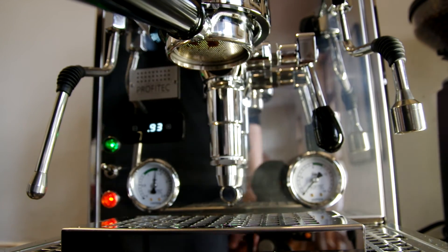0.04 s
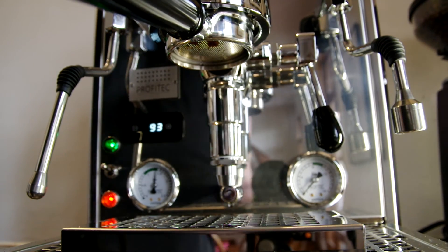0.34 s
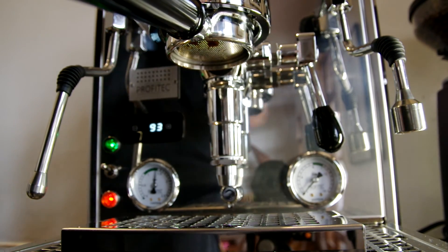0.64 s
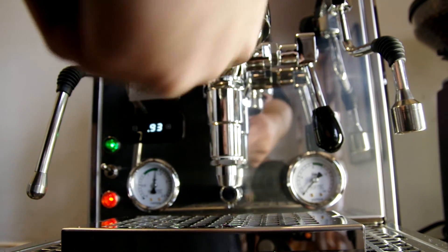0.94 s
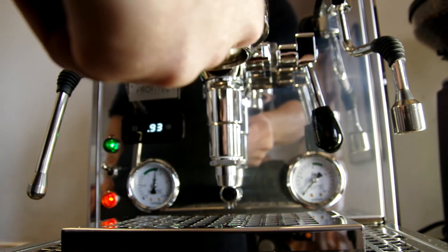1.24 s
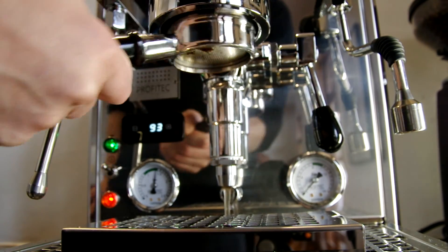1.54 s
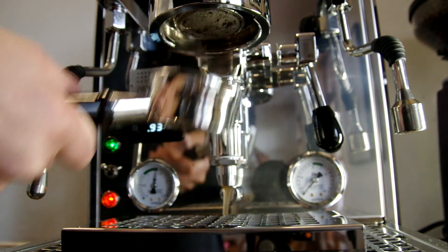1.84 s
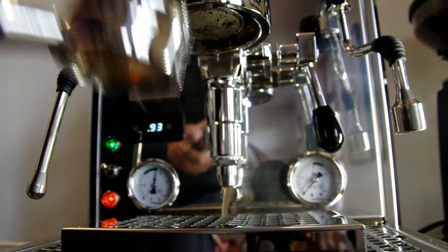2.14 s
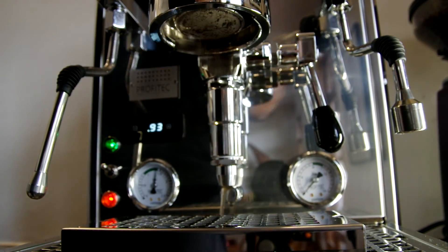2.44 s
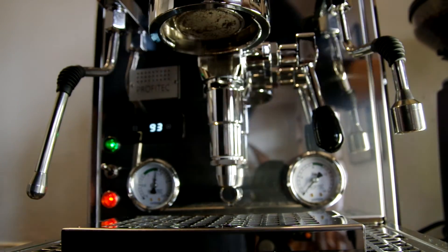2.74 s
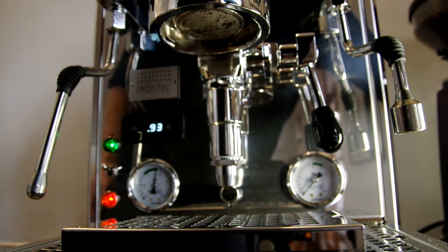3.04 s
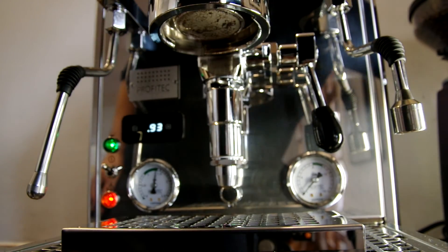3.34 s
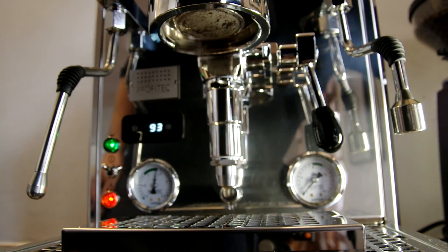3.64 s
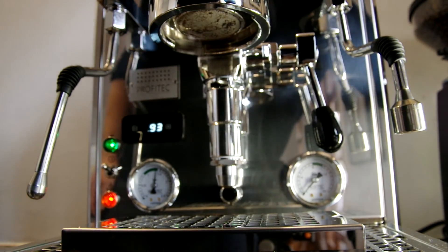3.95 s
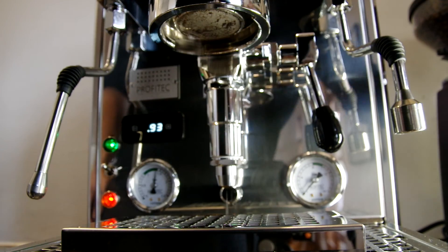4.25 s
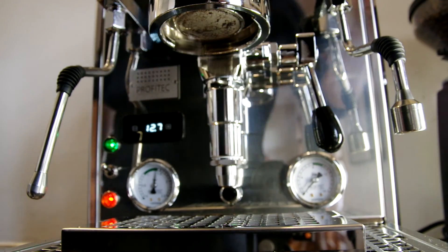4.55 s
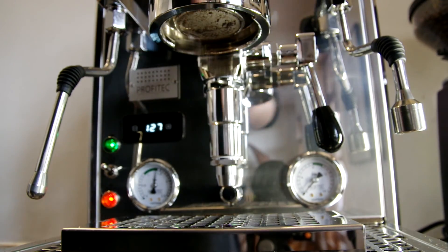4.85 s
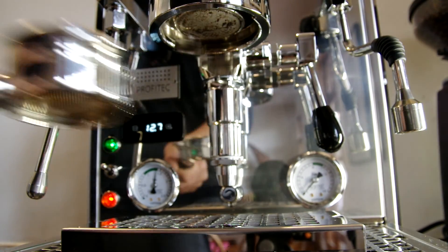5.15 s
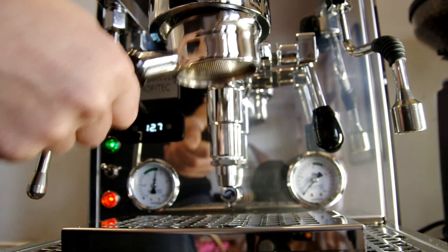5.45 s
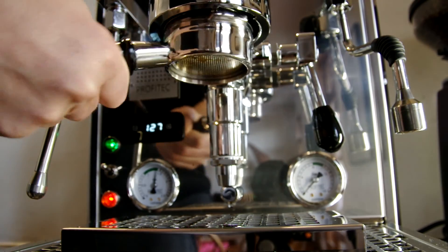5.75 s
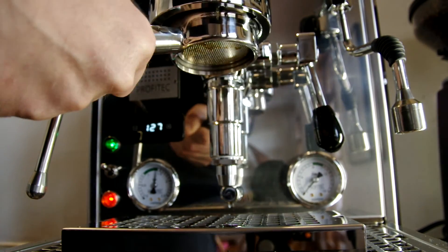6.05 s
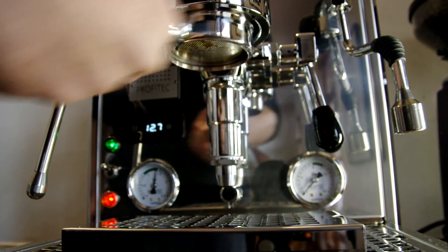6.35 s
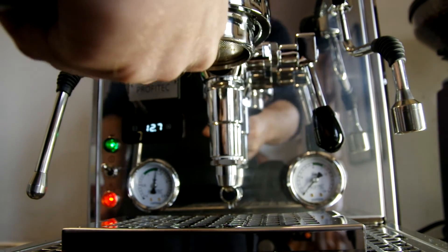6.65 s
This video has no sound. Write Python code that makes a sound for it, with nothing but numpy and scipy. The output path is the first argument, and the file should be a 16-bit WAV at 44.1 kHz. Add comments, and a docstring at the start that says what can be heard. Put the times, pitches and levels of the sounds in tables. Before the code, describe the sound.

A metal filter handle clanks out of an espresso machine, is banged empty, then clanks and grinds back in over faint hiss.

```python
"""A metal filter handle is twisted out of an espresso machine, banged empty on a knock box and locked in.
Impacts excite its normal modes, and stick-slip friction grinds at its lugs as it turns. The boiler
hisses and simmers; a brief opening clatter, small clinks, brushing cloth and soft footsteps surround it.
The close microphone's limiter ducks at each hard clank, so the kitchen's reverberation swells back."""
import sys
import numpy as np
from scipy import signal
from scipy.fft import rfft, irfft
from scipy.io import wavfile
from scipy.ndimage import uniform_filter1d

SR = 44100
rng = np.random.default_rng(int(sys.argv[2]) if len(sys.argv) > 2 else 0)


def wav_record(signal):
    """Record a signal, one row per channel, as 16-bit PCM in the file named by sys.argv[1]."""
    frames = np.transpose(np.atleast_2d(signal))
    bounded = np.clip(frames, -1, 1)
    # unit amplitude maps onto the largest positive 16-bit level
    quanta = np.round(bounded * 32767).astype(np.int16)
    wavfile.write(sys.argv[1], SR, quanta)


N = 304731
TIME = np.arange(N) / SR
T = TIME[:SR // 2]  # time axis of one impact


def amp(db):
    """Amplitude ratio: a factor of ten for every 20 dB."""
    return 10 ** (np.asarray(db) / 20)


def unit(x):
    """Normalisation to rms 1."""
    return x / np.sqrt(np.mean(x ** 2) + 1e-20)


def value_at(points, hz):
    """Linear interpolation on a logarithmic frequency axis."""
    f, value = np.transpose(points)
    return np.interp(np.log(hz + 1), np.log(f + 1), value)


def add(mix, s, sound):
    """Superposition of a sound on the mix, starting at s seconds."""
    part = mix[max(round(s * SR), 0):][:len(sound)]
    part += sound[:len(part)]


def noise(spectrum, size, tilt_db=0):
    """Spectral shaping of white noise to rms 1, with a tilt per octave above 1 kHz."""
    hz = np.fft.rfftfreq(size, 1 / SR)
    octaves = np.log2(np.maximum(hz, 1000))
    gain = amp(value_at(spectrum, hz) + tilt_db * octaves)
    return unit(irfft(rfft(rng.standard_normal(size)) * gain, size))


# steam hiss envelope: t/s, level/dB
HISS_ENVELOPE = [(0, -44), (3.5, -44.5), (5.3, -49.5), (6.9, -48)]
# spectra of the hiss and rumble, and the machine's steady tones: f/Hz, level/dB
HISS_SPECTRUM = [(900, -7.5), (1700, -8.5), (2600, -2), (4500, -1), (6500, 0.5), (8200, 0), (9700, -10),
                 (12000, -15), (16000, -26)]
RUMBLE_SPECTRUM = [(12, -39), (20, 4.5), (70, 5.5), (135, -0.5), (176, -2.5), (321, 2.5), (445, -18.5),
                   (720, -1.5), (943, -11), (1170, -20), (2000, -32.5), (2600, -47), (4400, -120)]
HUM_TONES = [(50, -60.5), (100, -63.5), (10718, -66.5)]

def boiler():
    """Broadband steam noise fades slightly over a low rumble and the line spectrum of a hum."""
    hiss = amp(np.interp(TIME, *np.transpose(HISS_ENVELOPE))) * noise(HISS_SPECTRUM, N)
    hum = sum(amp(db) * np.sqrt(2) * np.sin(2 * np.pi * hz * TIME) for hz, db in HUM_TONES)
    return hiss + hum + amp(-53) * noise(RUMBLE_SPECTRUM, N)


# the kitchen's reverberation: f/Hz, T60/s, level/dB
ROOM_BANDS = [(80, 0.81, 9), (163, 0.46, -3.5), (250, 0.8, 11), (326, 0.81, 2.5), (520, 0.91, 2),
              (990, 0.67, 3), (1540, 0.89, 2), (2940, 0.73, -1), (8150, 0.57, -0.5), (11200, 0.42, 0),
              (16000, 0.23, 0)]

def room_decay(x):
    """Absorption: each band falls by 60 dB in its own reverberation time."""
    hz, t, bands = signal.stft(x, SR, nperseg=256)
    t60 = value_at([row[:2] for row in ROOM_BANDS], hz)[:, None]
    return signal.istft(bands * np.exp(-np.log(1000) * t / t60), SR, nperseg=256)[1][:len(x)]


def kitchen(x):
    """Diffuse field: convolution with reflections that build up over the first milliseconds."""
    reflections = noise([(hz, db) for hz, _, db in ROOM_BANDS], SR)
    tail = room_decay(reflections) * (1 - np.exp(-TIME[:SR] / 0.0009))
    return signal.fftconvolve(x, tail / np.linalg.norm(tail))[:N]


# spectrum of the clatter: f/Hz, level/dB
CLATTER_SPECTRUM = [(35, -51), (60, -32), (108, -24), (139, -10.5), (189, -25), (238, 1), (408, -21),
                    (579, -10.5), (767, -13.5), (991, -7), (1140, -9.5), (1660, -11.5), (3670, -19.5),
                    (7940, -17.5), (16000, -48)]

def opening_clatter(level_db=-19, fade_s=0.46):
    """Reverberant decay: a clatter rings out in the room at the very start."""
    out = np.zeros(N)
    tail = room_decay(noise(CLATTER_SPECTRUM, SR))
    add(out, 0.011, amp(level_db) * tail * np.exp(-TIME[:SR] / fade_s))
    return out


# the largest bubbles: t/s, level/dB
LARGE_BUBBLES = [(.305, -40.5), (.496, -40.5), (.615, -40), (.908, -43), (2.035, -35.5), (2.151, -41.5),
                 (2.361, -39.5), (3.426, -41), (3.507, -39.5), (4.268, -38.5), (4.495, -36.5), (4.983, -42),
                 (5.369, -39)]
# spectrum of one collapse: f/Hz, level/dB
BUBBLE_SPECTRUM = [(100, -30), (320, -1.5), (470, -24), (640, -3.5), (740, 3.5), (860, -8.5), (1100, -28),
                   (2500, -43), (16000, -70)]

def simmer(small_per_s=34, small_db=-49.5, spread_db=3, decay_s=0.0032):
    """Bubble collapse in the boiler radiates dull ticks, a few large among many small."""
    out, t = np.zeros(N), T[:4096]
    draws = rng.random((round(small_per_s * N / SR), 2))
    small = [(when * N / SR, small_db + spread_db * (3 * size ** 2 - 1)) for when, size in draws]
    pulse = t / decay_s * np.exp(1 - t / decay_s)
    for s, db in [*LARGE_BUBBLES, *small]:
        add(out, s, amp(db) * noise(BUBBLE_SPECTRUM, len(t)) * pulse)
    return out


def damped_blows(rows, rise_s, skirt_db, tone_db):
    """Damped resonance: one tone in a band of noise that falls away on both sides."""
    out = np.zeros(N)
    for s, db, hz, decay in rows:
        band = [(hz / 8, 2 * skirt_db), (hz / 2, skirt_db), (hz, 0),
                (hz * 2, skirt_db), (hz * 64, 7 * skirt_db)]
        body = unit(noise(band, len(T)) + amp(tone_db) * np.sin(2 * np.pi * hz * T))
        add(out, s, amp(db) * body * np.exp(-T / decay) * (1 - np.exp(-T / rise_s)))
    return out


# light ticks and small things nudged on the counter: t/s, level/dB, f/Hz, decay/s
CLINKS = [(0.403, -20, 8000, 0.0023), (2.598, -41.5, 1840, 0.027), (2.634, -28, 2520, 0.01),
          (2.706, -39, 2157, 0.033), (2.75, -38, 2090, 0.018), (2.791, -29, 3350, 0.0088),
          (4.332, -36.5, 2690, 0.012)]

def clinks():
    """Brief contacts excite high, narrow resonances in small objects."""
    return damped_blows(CLINKS, rise_s=0.00056, skirt_db=-35, tone_db=1)


# footfalls and soft bumps: t/s, level/dB, f/Hz, decay/s
STEPS = [(.68, -27, 132, 0.013), (.705, -18, 148.7, 0.038), (.725, -25.5, 55.4, 0.047),
         (1.545, -36.5, 96, 0.072), (2.392, -34.5, 137, .027), (2.45, -30, 88, 0.028),
         (2.945, -35, 145.7, 0.043), (4.703, -28, 102.6, 0.024), (6.225, -25.5, 132.4, 0.031),
         (6.67, -35.5, 98.3, 0.1)]

def footsteps():
    """Soft, slow contacts with the floor excite mainly low frequencies."""
    return damped_blows(STEPS, rise_s=0.0054, skirt_db=-8.5, tone_db=10)


def ring(modes, scatter_db=2.5, detune=0):
    """Free vibration: damped modes, rms 1 at onset, with random weights, phases and optional detuning."""
    hz, db, t60 = np.transpose(modes)[:, :, None]
    weight = amp(db + scatter_db * rng.standard_normal(hz.shape))
    hz = hz * (1 + detune * rng.standard_normal(hz.shape))
    waves = np.sin(2 * np.pi * (hz * T + rng.random(hz.shape))) * np.exp(-np.log(1000) * T / t60)
    return (weight * waves).sum(0) / np.sqrt(np.sum(weight ** 2) / 2)


def strikes(rows, spectrum, modes, spot_db):
    """Impulse excitation of metal: a dense crack, the struck spot's short note, then the body's modes."""
    out = np.zeros(N)
    for s, db, decay, tilt_db, hz, ring_db in rows:
        spot = amp(spot_db) * np.sqrt(2) * np.sin(2 * np.pi * hz * T)
        crack = (noise(spectrum, len(T), tilt_db) + spot) / np.hypot(1, amp(spot_db))
        blow = crack * np.exp(-T / decay) + amp(ring_db) * ring(modes, detune=0.0021)
        add(out, s, amp(db) * blow * (1 - np.exp(-T / 0.0001)))
    return out


# handle on the brew head: t/s, level/dB, decay/s, tilt/(dB/octave), spot f/Hz, ring level/dB
CLANKS = [(0.688, -30, .0059, 11, 7930, -24), (1.342, -25, 0.0042, -1, 3090, -27),
          (1.3822, 16, 0.0038, 0.5, 4290, -28), (1.542, -15, 0.0041, -5.5, 2770, -35),
          (1.5923, 11, 0.0038, -1.5, 4400, -17.5), (1.646, -13, 0.014, -8.5, 4240, -27),
          (1.656, -0.5, 0.0029, 5.5, 3080, -17), (1.719, -16.5, 0.0043, 5, 3800, -5.5),
          (1.736, -28, 0.0051, -15, 1410, -6), (5.4798, 18.5, 0.0023, -2, 6920, -8.5),
          (5.506, -4.5, 0.015, -6, 8440, -20), (5.5714, -10.5, 0.0034, -3, 8140, -2.5),
          (5.6925, -16, 0.0035, 2.5, 4030, -16), (5.705, -22, 0.0058, -3, 1410, -19),
          (5.7668, -22.5, .0028, 6, 3720, -9), (5.8178, 1, .0023, 9, 4920, -3),
          (5.822, 20.5, 0.0037, -1, 6850, -15), (5.834, 14, .0062, 1, 9730, -14.5),
          (5.8411, 16, 0.0067, -0.5, 8630, -23), (6.2279, -17.5, 0.0053, 0, 6480, -16),
          (6.2378, 2, 0.0019, 0.5, 6330, -25), (6.2475, -13, 0.0039, -6, 6200, -13),
          (6.2818, -18.5, 0.008, -5.5, 4450, -10), (6.3041, -11, 0.0033, -4, 4340, -8),
          (6.3795, -29.5, 0.02, -6, 1542, -9), (6.427, -32, 0.013, -4, 6500, -14)]
# contact spectra with the basket full and empty: f/Hz, level/dB
FULL_SPECTRUM = [(100, -28), (240, -13.5), (500, -21), (950, -18), (1300, -6.5), (1800, -6), (2400, -5),
                 (3300, -5), (4500, 0), (6500, -5), (8500, -3.5), (10500, -12), (16000, -27)]
EMPTY_SPECTRUM = [(100, -28), (240, -15), (500, -23.5), (1000, -21), (1520, -3), (2100, -10.5), (3000, -4),
                  (4400, 2), (6000, -1), (8400, 1.5), (10500, -3), (13000, -1.5), (16000, -10.5)]
# modes of the handle and its basket: f/Hz, level/dB, T60/s
HANDLE_MODES = [(1321, -6, 0.11), (1487, -5, 0.085), (1589.5, -1.5, .15), (2997, -16.5, 0.17),
                (3890, 0, 0.075), (4440, -11, 0.11), (4960, -9.5, 0.19), (6660, -3, 0.036), (7210, -2, 0.1),
                (8300, 4.5, 0.04), (8620, -5, 0.049), (9700, -9, 0.072), (10600, 1.5, .06),
                (11900, -11, .06)]

def handle(spot_db=-3.5):
    """Damping by wet grounds dulls the handle's clanks until the bang empties it."""
    emptied_s = BANG[0]
    full = strikes([row for row in CLANKS if row[0] < emptied_s], FULL_SPECTRUM, HANDLE_MODES, spot_db)
    empty = strikes([row for row in CLANKS if row[0] > emptied_s], EMPTY_SPECTRUM, HANDLE_MODES, spot_db)
    return full + empty


# brushes of hand and sleeve: t/s, level/dB, duration/s
BRUSHES = [(0.85, -39, 0.14), (2.557, -46, 0.11), (4.217, -46.5, 0.089), (4.308, -43.5, .12),
           (4.972, -48.5, 0.14), (6.788, -45, 0.14)]
# spectrum of rubbed cloth: f/Hz, level/dB
CLOTH_SPECTRUM = [(500, -25), (4500, -13.5), (7800, 0), (10000, -7), (15000, -16)]

def brushes(skew=0.4):
    """Friction noise of skin and cloth swells quickly and trails off."""
    out = np.zeros(N)
    for s, db, length in BRUSHES:
        size = round(length * SR)
        swell = np.sin(np.pi * np.linspace(0, 1, size) ** skew)
        add(out, s, amp(db) * noise(CLOTH_SPECTRUM, size) * swell)
    return out


# lugs sliding in their groove or along the brew head's lip:
# t/s, duration/s, level/dB, drop over the stroke/dB, tilt/(dB/octave), ring level/dB
STROKES = [(0.909, 0.35, -46.5, 1, -2, -15), (1.322, 0.072, -38.5, -9, 0.5, -8),
           (1.492, 0.49, -38, 7.5, -3, -21), (5.528, 0.32, -32, 16, -2, -5),
           (5.852, 0.35, -31, 18.5, 0, -11), (6.189, 0.25, -38, 11, 0, -14),
           (6.42, .17, -38, 1.5, -2.5, -6), (6.592, 0.087, -27, 7.5, -2.5, 4.5),
           (6.714, 0.16, -34, 15, -3, 1)]
# spectrum of the grinding: f/Hz, level/dB
GRIND_SPECTRUM = [(30, -2), (130, 8.5), (300, 6.5), (700, 1.5), (1400, 2), (2400, 0), (3300, -2.5),
                  (5500, 0), (8500, -4), (11000, -13), (16000, -35)]
# modes of the handle clamped in the brew head: f/Hz, level/dB, T60/s
CLAMPED_MODES = [(1550, -21, .1), (2132, -14, 0.29), (2660, -7.5, 0.091), (3740, -12, 0.09),
                 (4883, -7.5, .14), (5180, -1, 0.048), (5330, 2.5, 0.051), (5740, -5, 0.086),
                 (6580, 0, .07), (6780, -5, 0.11), (6944, 2, 0.17), (8240, -9, 0.12), (8730, -7, 0.11),
                 (10230, -13.5, 0.16), (13100, -14, 0.055)]

def turning(slips_per_s=2600, rise_s=0.0064, release_s=0.03):
    """Stick-slip friction: the lugs break free, grind, drive the clamped modes and coast to a stop."""
    out = np.zeros(N)
    for s, length, db, drop_db, tilt_db, ring_db in STROKES:
        t = np.arange(0, length + 5 * release_s, 1 / SR)
        force = np.interp(t, [0, rise_s], [0, 1]) * amp(db - drop_db * np.minimum(t / length, 1))
        force *= np.exp(-np.maximum(t - length, 0) / release_s)
        size = len(t) + len(T) - 1
        slips = rng.exponential(1, size) * (rng.random(size) < slips_per_s / SR)
        grip = unit(signal.fftconvolve(slips, np.exp(-T / 0.011), "valid"))
        ringing = unit(signal.fftconvolve(slips, ring(CLAMPED_MODES), "valid"))
        grind = grip * noise(GRIND_SPECTRUM, len(t), tilt_db)
        add(out, s, force * (grind + amp(ring_db) * ringing))
    return out


# handle on the box's rim: t/s, level/dB, decay/s, tilt/(dB/octave), spot f/Hz, ring level/dB
KNOCKS = [(3.1565, -12.5, 0.007, -0.9, 8600, -26.5), (3.2175, -15, 0.0046, -3, 8150, -9),
          (3.627, 16.5, 0.0023, -4.5, 4900, -26), (3.6445, 22, 0.005, 4.5, 8690, -33)]
# the heavy blow on the padded bar: t/s, level/dB, decay/s
BANG = (3.627, 14.15, 0.0038)
# contact spectra of the rim and the bar: f/Hz, level/dB
RIM_SPECTRUM = [(100, -12), (600, -15), (950, -15), (1300, -3.5), (1850, -32), (2700, -9.5), (3900, -3),
                (5200, 2), (6500, 0), (8500, 2.5), (10500, -2), (16000, -9)]
THUD_SPECTRUM = [(40, -6), (100, -20), (170, -5), (330, 2), (430, -1), (560, 5.5), (800, 2), (1050, 4),
                 (1450, -1), (2100, -7), (3000, -10), (5000, -24), (16000, -33)]
# modes of the rim and the hollow box: f/Hz, level/dB, T60/s
RIM_MODES = [(1160, -8, 0.15), (1280, -4, 0.068), (3420, 4, 0.061), (3800, 11, 0.052), (5330, -3, 0.098),
             (5730, -5, 0.11), (7460, -12, .15), (8200, 5, 0.11), (9900, -8, 0.12), (10300, -1, 0.14),
             (11000, -15, 0.13)]
BOX_MODES = [(170, -1.5, .06), (234, -3.5, 0.065), (300, 0, 0.057), (413, -3, 0.052), (527, 0.5, 0.065),
             (702, -7, 0.032), (930, -11, 0.042), (1324, -8.5, 0.052), (1495, -13, .05)]

def knock_box(thud_db=-4, hollow_db=-1, damping_s=0.046):
    """Two taps ring the rim; a bang excites the box's hollow resonances and the basket rattles after."""
    out = strikes(KNOCKS, RIM_SPECTRUM, RIM_MODES, spot_db=-9.5)
    s, db, decay = BANG
    burst = rng.standard_normal(len(T)) * np.exp(-T / decay)
    # the thud has the bar's spectrum with the burst's phase and energy
    magnitude = amp(value_at(THUD_SPECTRUM, np.fft.rfftfreq(len(T), 1 / SR)))
    phase = np.angle(rfft(burst))
    thud = irfft(magnitude * np.exp(1j * phase), len(T)) * np.exp(-T / damping_s)
    thud *= np.linalg.norm(burst) / np.linalg.norm(thud)
    hollow = sum((-1) ** k * amp(mode_db) * np.cos(2 * np.pi * hz * T) * np.exp(-np.log(1000) * T / t60)
                 for k, (hz, mode_db, t60) in enumerate(BOX_MODES)) / 2
    add(out, s, amp(db) * (amp(thud_db) * thud + amp(hollow_db) * hollow))
    return out


def scene():
    """The direct-to-reverberant ratio falls with distance: machine close, counter and floor farther."""
    machine = handle() + turning()
    counter = knock_box() + clinks()
    floor = footsteps()
    room = kitchen(amp(-21) * machine + amp(-14) * counter + amp(-17.5) * floor)
    return (machine + counter + floor + room + opening_clatter() + simmer() + brushes() + boiler())[None]


def record(dry, threshold_db=-11, cut_per_db=0.88, recovery_db_per_s=114, ceiling=0.9, cutoff_hz=16200):
    """Peak limiting with fast attack and steady recovery, then clipping and a low-pass band limit."""
    power_db = 10 * np.log10(abs(uniform_filter1d(dry[0] ** 2, size=64)) + 1e-12)
    cut_db = cut_per_db * np.maximum(power_db - threshold_db, 0)
    recovery_db = TIME * recovery_db_per_s
    held_db = np.maximum.accumulate(cut_db + recovery_db) - recovery_db
    gain = amp(-uniform_filter1d(held_db, size=24))
    limited = np.clip(dry * gain, -ceiling, ceiling)
    low_pass = signal.firwin(255, cutoff_hz, window=("kaiser", 9), fs=SR)
    return signal.oaconvolve(limited, low_pass[None], "same")


dry = scene()
out = record(dry)
wav_record(out)
```